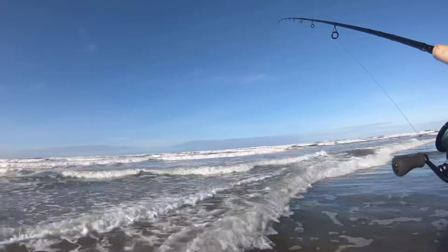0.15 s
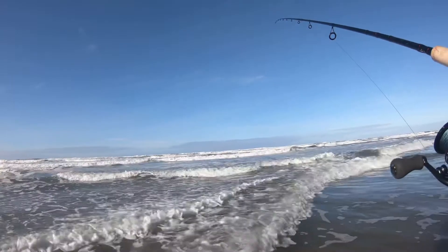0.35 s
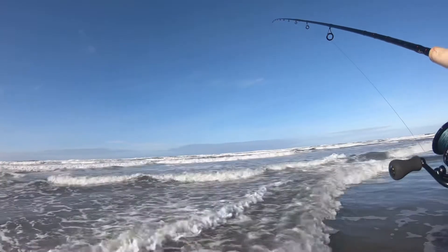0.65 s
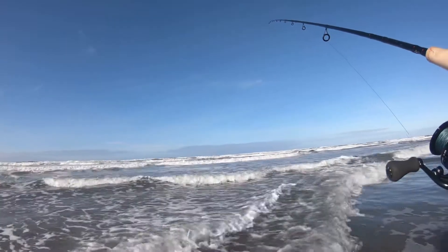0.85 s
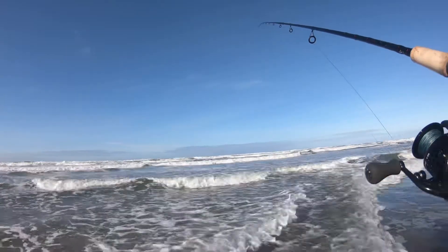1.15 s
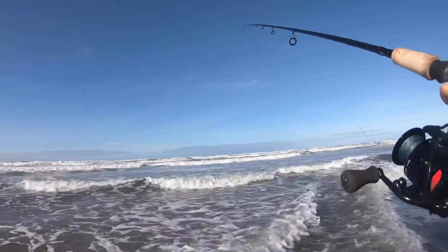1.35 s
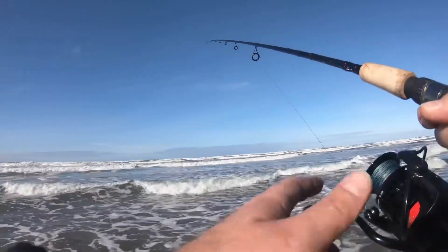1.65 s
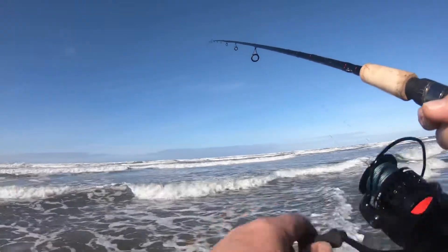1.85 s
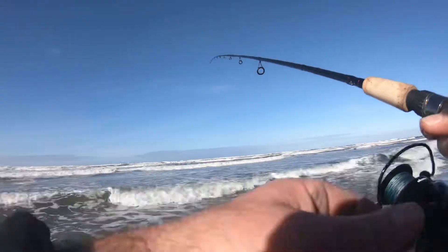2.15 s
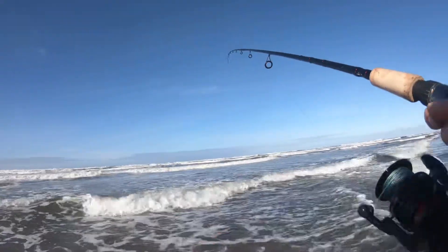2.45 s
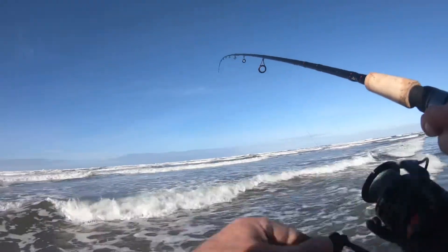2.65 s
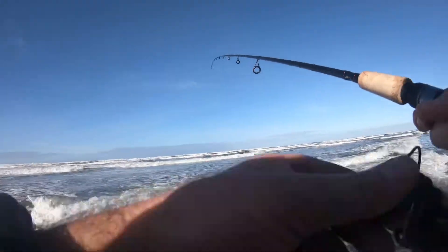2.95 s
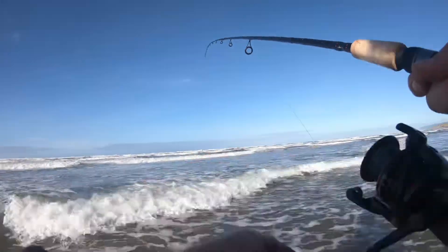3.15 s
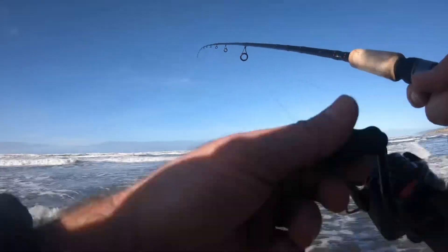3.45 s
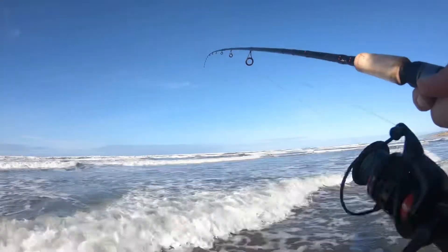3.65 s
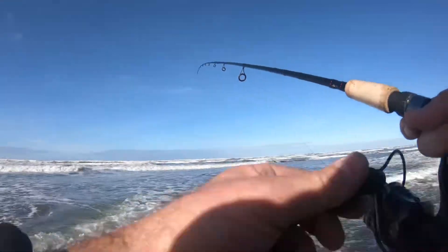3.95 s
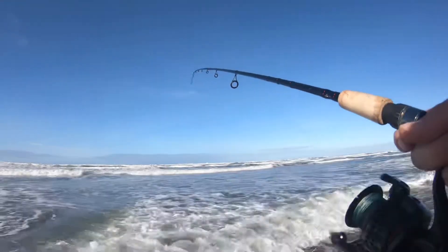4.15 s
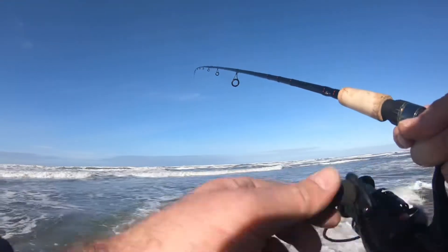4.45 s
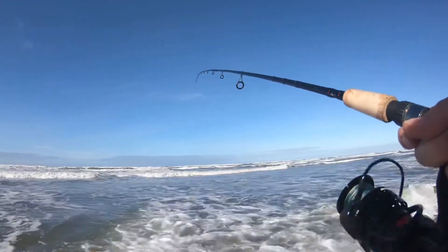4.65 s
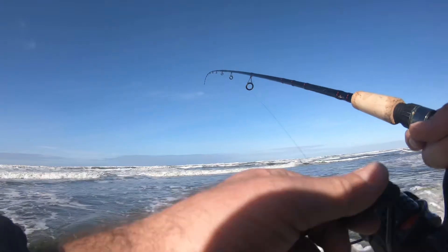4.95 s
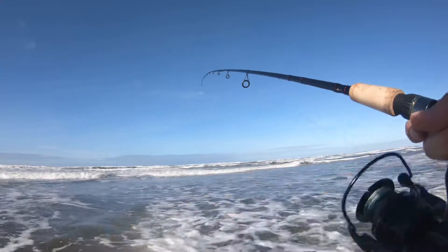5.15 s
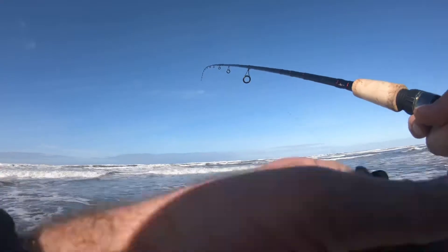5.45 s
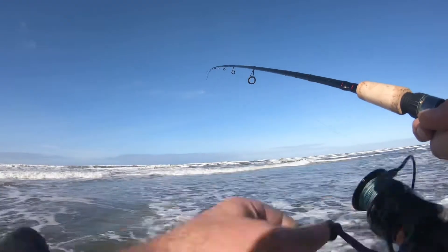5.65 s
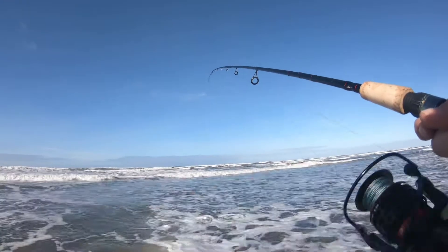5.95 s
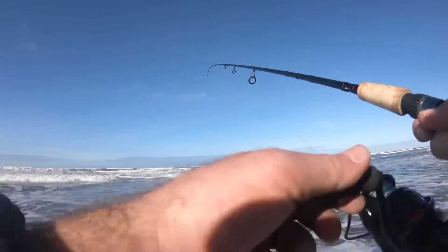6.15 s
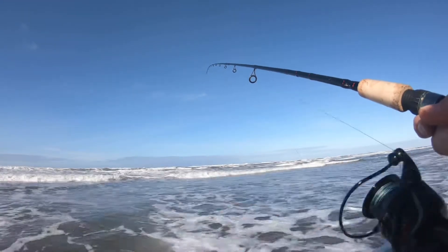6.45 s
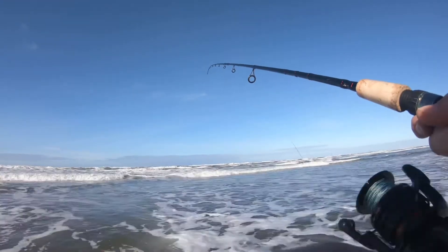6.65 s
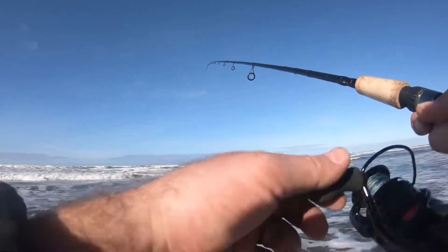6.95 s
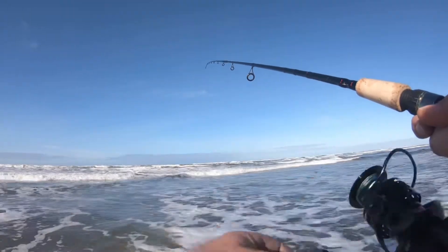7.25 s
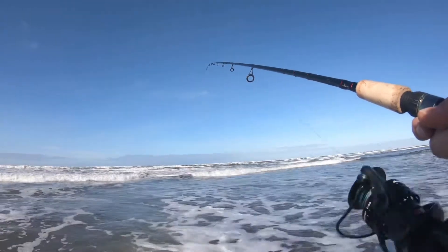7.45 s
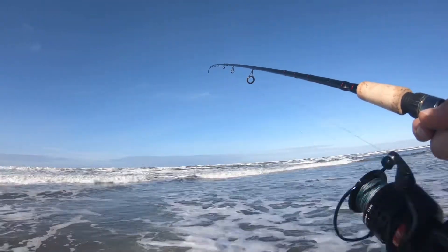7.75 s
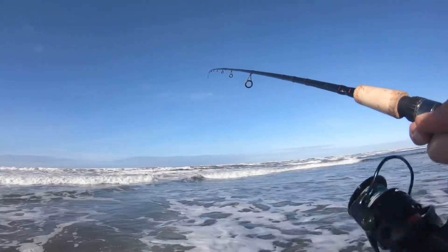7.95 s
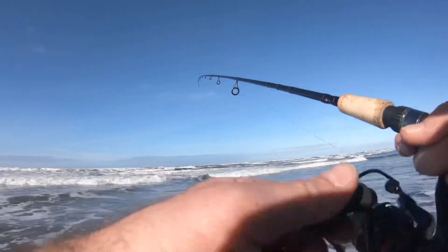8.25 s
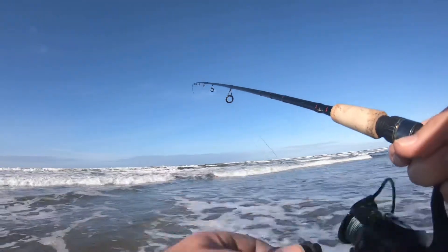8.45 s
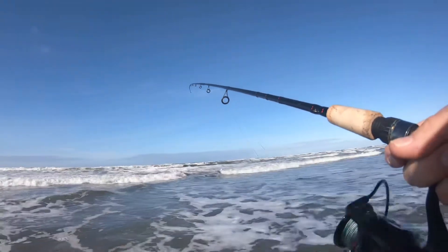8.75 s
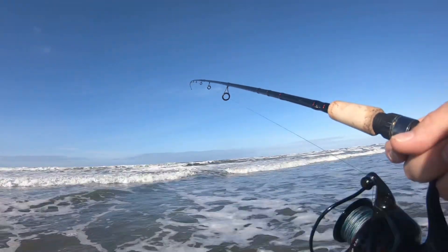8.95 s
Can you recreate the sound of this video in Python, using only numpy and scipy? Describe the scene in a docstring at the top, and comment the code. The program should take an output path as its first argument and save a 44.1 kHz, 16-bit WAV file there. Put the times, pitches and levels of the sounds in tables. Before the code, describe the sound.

Surf roars steadily far out while a nearby foamy wave washes past and drains, with one hard knock and scattered clicks from handled gear.

```python
"""An angler in shallow surf winds a spinning reel: each stroke of the handle is a low, swelling sway with a
dull rustle, made from a short sine and filtered noise. Gear knocks against the chest-worn camera with a crack,
a ring and a thud; light ticks of the reel and small taps on the camera are short tones. Behind this, shaped
noise and single pops make breakers roar far out and one foaming wave drain away before the next rolls in and
fizzes past. A faint breeze rumbles on the camera."""
import sys
import numpy as np
from scipy import signal
from scipy.fft import rfft, irfft, next_fast_len
from scipy.io import wavfile
from scipy.ndimage import uniform_filter1d, map_coordinates

SR = 44100
rng = np.random.default_rng(int(sys.argv[2]) if len(sys.argv) > 2 else 0)


def generate_wav(signal):
    """Clip the signal to [-1, 1] and save it as 16-bit WAV at the path in sys.argv[1]."""
    frames = np.transpose(np.atleast_2d(signal))
    scaled = np.clip(frames, -1, 1) * 32767
    pcm = np.round(scaled).astype(np.int16)
    wavfile.write(sys.argv[1], SR, pcm)


N = 401751  # length in samples

# Faint buffeting of the sea breeze. Each row: pitch in Hz, relative strength in dB per Hz.
BREEZE_SPECTRUM = [(20, 6), (60, 2), (110, -2), (220, -28), (600, -90)]
BREEZE_DB, GUST_DB, GUSTS_PER_S = -64, 8, 7.5

# Rise and fall of the far surf. Each row: time in seconds, roar level in dB before a fixed lift.
BREAKER_LEVELS = [(0.0, -36.5), (1.77, -34.5), (2.51, -36.5), (4.85, -32.5), (5.05, -34.5), (5.66, -37),
                  (9.11, -37)]
# Tone of the far surf. Each row: pitch in Hz, relative strength in dB per Hz.
ROAR_SPECTRUM = [(25, -23), (70, -12.5), (115, -13), (152, -0.5), (210, 0), (310, -1), (450, -5.5),
                 (600, -5), (760, -1), (1020, -7), (1600, -5.5), (2100, -5), (2600, -20), (5000, -73)]

# The nearest wave. Each row: time in seconds, then the levels of its tumbling front and of its
# bursting foam in dB, before the adjustments below.
WAVE_LEVELS = [(0.0, -27.5, -42), (0.3, -27.5, -42), (1.2, -31.5, -43.5), (1.68, -32.5, -42.5),
               (2.2, -34.5, -45.5), (2.6, -35, -45.5), (3.3, -31, -44.5), (3.5, -32.5, -45.5),
               (4.05, -26.5, -42.5), (4.27, -27, -42.5), (4.38, -24.5, -37), (5.02, -28.5, -39.5),
               (5.25, -33.0, -43.5), (6.0, -41.5, -50.5), (7.1, -41, -52.5), (8.25, -38.5, -50.5),
               (8.65, -36.5, -49.5), (9.11, -37.5, -48.5)]
# Tones of the wave's front, wash and foam. Each row: pitch in Hz, relative strength in dB per Hz.
FRONT_SPECTRUM = [(400, -46), (800, -13.5), (1020, -12), (1350, -3.5), (1600, -0.5), (1850, -5.5),
                  (2150, -6.5), (2600, -28), (5000, -63)]
WASH_SPECTRUM = [(1000, -34), (1650, -12.5), (2050, 1), (2300, 0), (2600, -1), (3050, -13), (3600, -12.5),
                 (4100, -20), (4600, -17.5), (6000, -28.5), (9000, -71)]
FOAM_SPECTRUM = [(1500, -39), (2600, 6), (3400, 2.5), (4100, -5), (4900, 2.5), (6000, -0.5), (7200, -4.5),
                 (9000, -9), (10800, -14), (12000, -24), (13500, -25), (14300, -40)]
FRONT_DB, WASH_DB, FOAM_DB = 0.5, 5, -4  # each part of the wave against its curve
WASH_FOAMINESS = 0.57  # the wash lies between front (0) and foam (1)
FOAM_GROWS = 1.39  # the fizz swings this many times wider than the foam curve, in dB
SURGE_DB, SURGE_PER_S = 0.51, 18  # quick surges of the whole wave
SLOSH_DB, SLOSH_PER_S = 0.5, 7  # each part also swells on its own

# Air cavities of the camera housing. Each row: pitch in Hz, width in Hz, boost (or dip) in dB.
HOUSING_CAVITIES = [(1602, 170, 3.5), (1823, 190, -4.5), (2084, 240, 2), (3290, 240, -5.5), (3405, 120, 4),
                    (4530, 710, 0.5), (8530, 410, 6)]
# How the left and right sound ports differ for far sounds, near sounds and blows on the shell.
# Each row: pitch in Hz, left level minus right in dB, left lead in radians, likeness from 0 to 1.
FAR_PORTS = [(100, -0.4, -0.04, 0.984), (310, 0.1, -0.04, 0.995), (490, 0.5, -0.26, 0.97),
             (600, 4.0, -0.9, 0.92), (820, -4.5, -2.68, 0.96), (1000, -1.1, -3.27, 0.97),
             (1150, 5.1, -4.18, 0.6), (1350, -1.5, -5.77, 0.87), (1650, -5.3, -5.63, 0.93)]
NEAR_PORTS = [(823, -18, 6, 0.69), (1160, -2.5, 1.1, 0.15), (1290, -2, 1.33, 0.98),
              (1620, -6.5, -0.1, 0.72), (1820, -0.5, 1.07, 0.99), (2200, -14.5, -1, 1),
              (2520, -8, 0.6, 0.63), (3230, -4.9, 1, 0.24), (3640, -0.5, 2.5, 0.59),
              (3790, -15, -0.5, 0.08), (4870, -2.5, 3, 0.8), (5930, -7, 3.5, 0.54), (7900, -1.5, 2, 0.09),
              (10000, 0.2, 0.2, 0.36)]
STRUCK_PORTS = [(300, 0, -0.1, 1), (450, 1, -2, 1), (800, 0, -2.6, 1), (1000, -1, -2, 1),
                (1200, -4, -1.2, 1)]

# Light ticks of the reel and small taps on the camera. # Each row: start in seconds, peak level in dB before
# the ports, pitch in Hz.
LIGHT_CLICKS = [(1.3565, -13.5, 1250), (1.4695, -33, 8500), (1.5432, -11.5, 2100), (1.8182, -17, 2100),
                (2.4152, -22, 2100), (3.9232, -9.5, 1220), (4.024, -14, 2000), (4.913, -17, 2100)]

# Gear bumping the camera. Each row: start in seconds, then the levels of the shell's ring and of
# the dull thud in dB, before fixed lifts.
KNOCKS = [(3.4073, -0.5, -3), (3.978, -22, -19), (4.982, -12, -16.5)]
# Ringing tones of the camera's shell and of its chest mount.
# Each row: pitch in Hz, relative level in dB, time to fade by 60 dB in seconds.
SHELL_MODES = [(605, -7.5, .036), (860, -4, .03), (1010, -1, .014), (1190, -1, .012), (2000, -16, .008),
               (4750, -26, .008)]
MOUNT_MODES = [(147, -1, 0.029), (221, 1, 0.02)]

# Shifts of the arm that rub the harness. Each row: start in seconds, rustle level in dB.
ARM_RUBS = [(1.308, -42), (1.639, -32), (2.38, -46), (3.899, -30)]
# Turns of the handle, each pushing the body. Each row: start in seconds, push in dB.
HANDLE_TURNS = [(0.54, -1), (1.106, -0.5), (1.66, -16), (2.294, -5), (2.847, -3), (3.43, -9), (3.969, -3),
                (4.546, -5), (5.119, -5), (5.702, -5), (6.265, -8), (6.849, -6), (7.43, -11), (8.014, -5.5),
                (8.6, -9)]
SWAY_DB, RUSTLE_DB = -24, -35  # for a push of 0 dB
RETURN_S, RETURN_DB = 0.228, -10  # delay and level of each turn's lighter return stroke

TOP_HZ = 14300  # the camera keeps only sound below this


def amp(db):
    """Turn decibels into a gain."""
    return 10 ** (np.asarray(db) / 20)


def unit(x):
    """Scale so that the average of the channels has an rms of 1."""
    middle = np.atleast_2d(x).mean(0)
    return x / np.sqrt(np.mean(middle ** 2) + 1e-20)


def along(rows, hz):
    """Read each column after the pitch, on a logarithmic pitch axis."""
    f, *cols = np.transpose(rows)
    return [np.interp(np.log(hz + 1), np.log(f + 1), c) for c in cols]


def curves(rows):
    """Draw each column after the time as a curve with one value per sample."""
    s, *cols = np.transpose(rows)
    return [np.interp(np.arange(N) / SR, s, c) for c in cols]


def wobble(rate):
    """Make a smooth random curve with rate random points a second."""
    points = rng.standard_normal(int(N * rate / SR) + 4)
    return map_coordinates(points, [np.arange(N) * rate / SR])


def filtered(x, response):
    """Shape a sound by a gain, and possibly a phase shift, at each pitch."""
    size = next_fast_len(N + 8192)
    return irfft(rfft(x, size) * response(np.fft.rfftfreq(size, 1 / SR)), size)[..., :N]


def add(track, s, sound):
    """Mix a sound into a track, starting at s seconds."""
    part = track[round(s * SR):][:len(sound)]
    part += sound[:len(part)]


def ring(modes, t, attack):
    """Add up fading tones that all start together with a soft edge."""
    tones = sum(amp(db - 60 * t / t60) * np.sin(2 * np.pi * hz * t) for hz, db, t60 in modes)
    return tones * (1 - np.exp(-t / attack))


def port_gains(ports, hz):
    """Split a sound's level and phase between the left and right ports, keeping its mean power."""
    tilt_db, lead, _ = along(ports, hz)
    left = amp(tilt_db / 2) * np.exp(1j * lead / 2)
    right = amp(-tilt_db / 2) * np.exp(-1j * lead / 2)
    gains = np.array([left, right])
    return gains / np.sqrt(np.mean(abs(gains) ** 2, axis=0))


def churn(patchy_db, pops_per_s, pop_share):
    """Make two streams of breaking water: a patchy rush of countless bubbles plus larger single pops."""
    z = signal.stft(rng.standard_normal((2, N)), nperseg=512)[2]
    # smoothed randomness makes patches over pitch and time
    field = uniform_filter1d(rng.standard_normal(z.shape[1:]), size=6, axis=0)
    field = uniform_filter1d(field, size=12, axis=1)
    rush = signal.istft(z * amp(patchy_db * field / field.std()), nperseg=512)[1][:, :N]
    pops = (rng.random((2, N)) < pops_per_s / SR) * rng.standard_normal((2, N))
    share = np.clip(pop_share, 0, 1)  # share of the power
    return np.sqrt(1 - share) * rush / rush.std() + np.sqrt(share) * pops / pops.std()


def heard(streams, spectrum, ports):
    """Colour two streams, then pass them through the housing's cavities to its two ports."""
    def colour(hz):
        cavity_db = sum(db / (1 + (2 * (hz - centre) / width) ** 2)
                        for centre, width, db in HOUSING_CAVITIES)
        # less likeness gives more of the second stream, which is opposite in the two ports
        turn = np.arccos(np.clip(along(ports, hz)[2], 0, 1)) / 2
        return amp(along(spectrum, hz)[0] + cavity_db) * np.array([np.cos(turn), np.sin(turn)])
    common, apart = filtered(streams, colour)
    pair = np.array([common + apart, common - apart])
    return unit(filtered(pair, lambda hz: port_gains(ports, hz)))


def breeze():
    """Light, uneven wind rumbles on the camera: low noise with a wandering level."""
    rumble = filtered(rng.standard_normal(N), lambda hz: amp(along(BREEZE_SPECTRUM, hz)[0]))
    return amp(BREEZE_DB + GUST_DB * wobble(GUSTS_PER_S)) * unit(rumble)


def breakers():
    """Lines of surf far out merge into a dull, even roar."""
    roar_db, = curves(BREAKER_LEVELS)
    water = churn(patchy_db=0.64, pops_per_s=150, pop_share=0.073)
    return amp(roar_db + 3.5) * heard(water, ROAR_SPECTRUM, FAR_PORTS)


def near_wave():
    """Large bubbles tumble in the front, smaller ones wash, and foam bursts finest; all surge together."""
    front_db, foam_db = curves(WAVE_LEVELS)
    wash_db = front_db + WASH_FOAMINESS * (foam_db - front_db)
    fizz_db = foam_db.mean() + FOAM_GROWS * (foam_db - foam_db.mean())
    front = heard(churn(patchy_db=0.76, pops_per_s=500, pop_share=0.17), FRONT_SPECTRUM, NEAR_PORTS)
    wash = heard(churn(patchy_db=1.1, pops_per_s=700, pop_share=0.099), WASH_SPECTRUM, NEAR_PORTS)
    foam = heard(churn(patchy_db=2.0, pops_per_s=2000, pop_share=0.25), FOAM_SPECTRUM, NEAR_PORTS)
    parts = [(front, front_db + FRONT_DB), (wash, wash_db + WASH_DB), (foam, fizz_db + FOAM_DB)]
    wave = sum(amp(db + SLOSH_DB * wobble(SLOSH_PER_S)) * water for water, db in parts)
    return amp(SURGE_DB * wobble(SURGE_PER_S)) * wave


def light_clicks():
    """Scattered light clicks, each a tone that fades within milliseconds."""
    track, t = np.zeros(N), np.arange(SR // 20) / SR
    for s, db, hz in LIGHT_CLICKS:
        click = ring([(hz, 0, 0.007)], t, attack=0.001)
        add(track, s, amp(db) * click / abs(click).max())
    return filtered(track, lambda hz: port_gains(NEAR_PORTS, hz))


def knocks(give_s=0.0009, bass_hz=90, crack_db=-24, crack_hz=3500):
    """A bump cracks on the plastic shell and rings it; the mount gives way a moment later and thuds."""
    track, t = np.zeros(N), np.arange(SR // 8) / SR
    stiff = signal.butter(1, bass_hz, "highpass", fs=SR, output="sos")  # tight strap passes little bass
    blunt = signal.butter(2, crack_hz, fs=SR, output="sos")  # a blunt contact has little treble
    thud = signal.sosfilt(stiff, ring(MOUNT_MODES, t, attack=0.0028))
    clack = ring(SHELL_MODES, t, attack=0.001)
    for s, ring_db, thud_db in KNOCKS:
        burst = amp(crack_db - 60 * t / 0.0047) * rng.standard_normal(len(t))  # fades 60 dB in 4.7 ms
        crack = signal.sosfilt(blunt, burst)
        add(track, s, amp(ring_db + 5.5) * (clack + crack))
        add(track, s + give_s, -amp(thud_db + 7.5) * thud)  # the minus starts it the opposite way
    return filtered(track, lambda hz: port_gains(STRUCK_PORTS, hz))


def winding(sway_hz=27, rise_s=0.026, rustle_low_hz=45, rustle_high_hz=130):
    """Each handle stroke sways the camera briefly and rubs its harness; shifts of the arm only rub."""
    track, t = np.zeros(N), np.arange(SR // 4) / SR
    swell = (t / rise_s) ** 2 * np.exp(2 * (1 - t / rise_s))  # peaks at 1 after rise_s
    dull = signal.butter(2, [rustle_low_hz, rustle_high_hz], "bandpass", fs=SR, output="sos")

    def rustle():
        """The harness rubbing: a fresh piece of low noise."""
        return unit(signal.sosfilt(dull, rng.standard_normal(len(t))))

    for s, db in ARM_RUBS:
        add(track, s, amp(db) * swell * rustle())
    for turn, push_db in HANDLE_TURNS:
        for s, db in [(turn, push_db), (turn + RETURN_S, push_db + RETURN_DB)]:
            stroke_hz = sway_hz * np.exp(0.17 * rng.standard_normal())  # varies around sway_hz
            sway = np.sin(2 * np.pi * stroke_hz * t)
            add(track, s, amp(db) * swell * (amp(SWAY_DB) * sway + amp(RUSTLE_DB) * rustle()))
    return track


def scene():
    """Mix the wind and surf with the clicks, the knocks and the winding."""
    return breeze() + breakers() + near_wave() + light_clicks() + knocks() + winding()


def record(dry):
    """The camera clips at full scale, then keeps nothing above its band limit."""
    return filtered(np.clip(dry, -1, 1), lambda hz: hz < TOP_HZ)


dry = scene()
out = record(dry)
generate_wav(out)
```